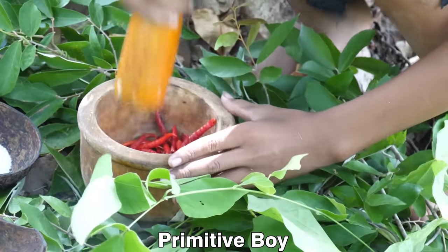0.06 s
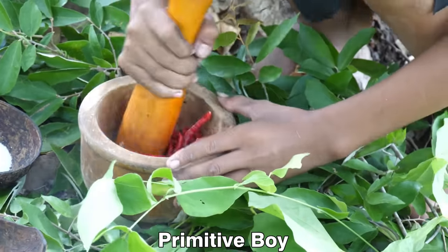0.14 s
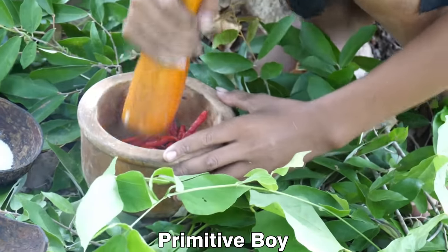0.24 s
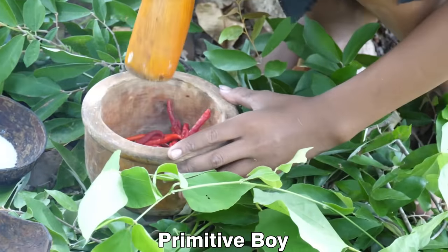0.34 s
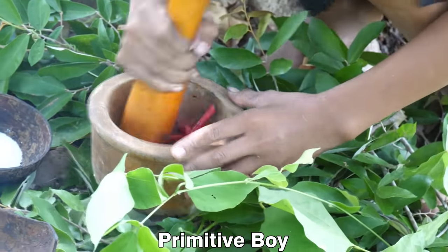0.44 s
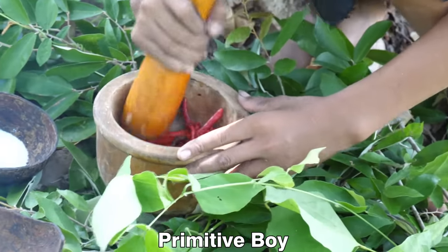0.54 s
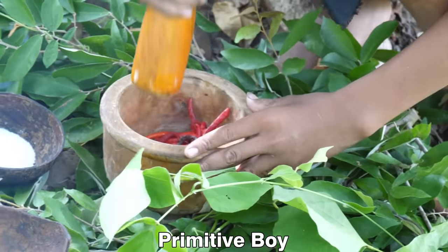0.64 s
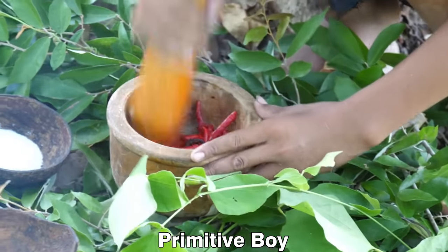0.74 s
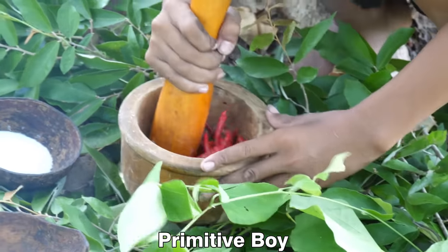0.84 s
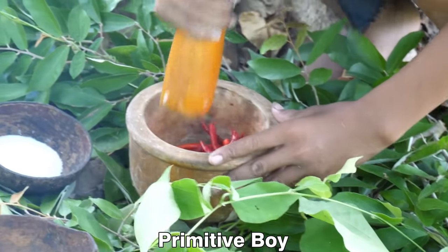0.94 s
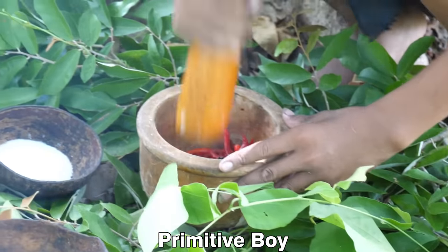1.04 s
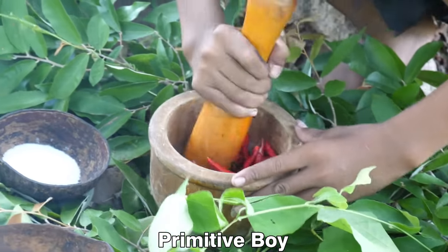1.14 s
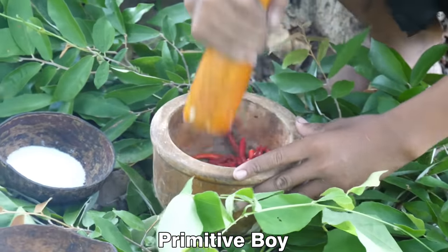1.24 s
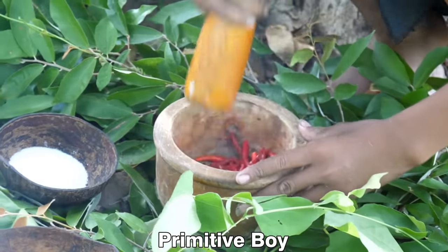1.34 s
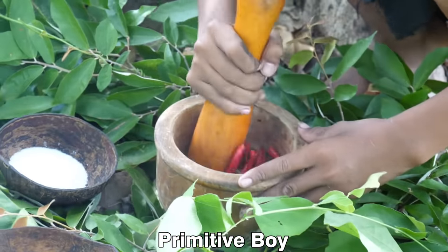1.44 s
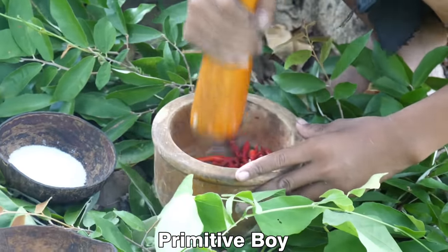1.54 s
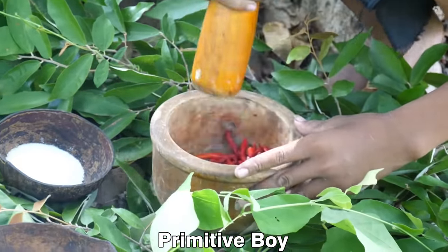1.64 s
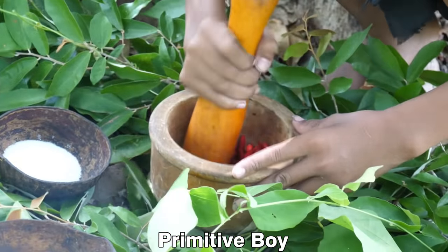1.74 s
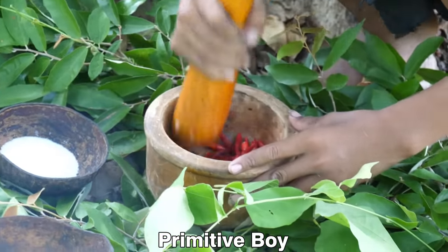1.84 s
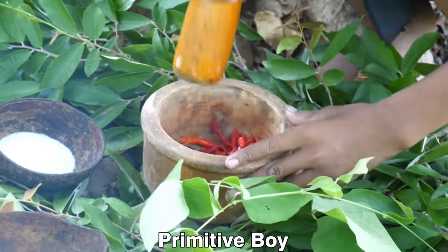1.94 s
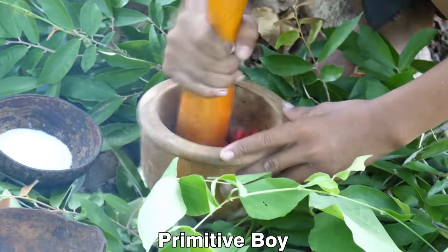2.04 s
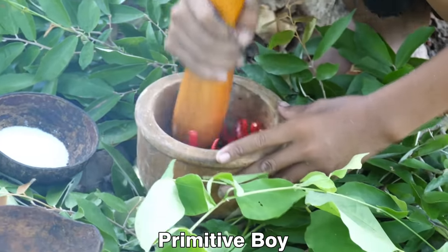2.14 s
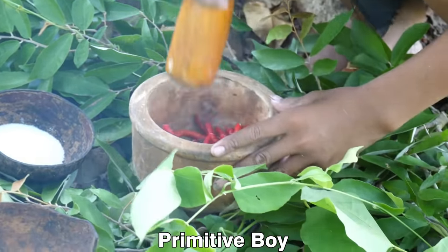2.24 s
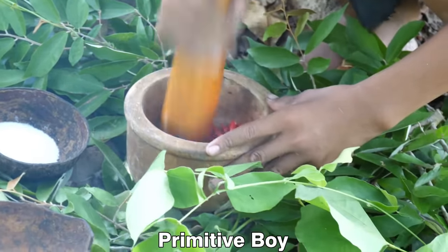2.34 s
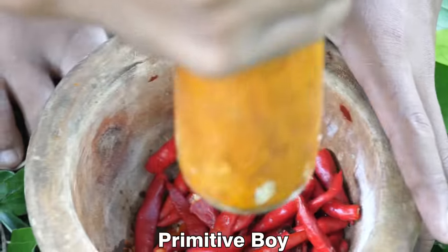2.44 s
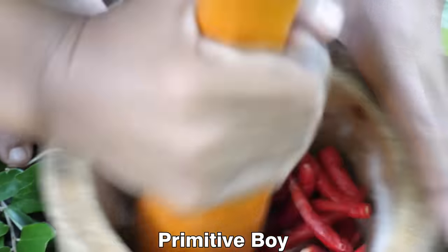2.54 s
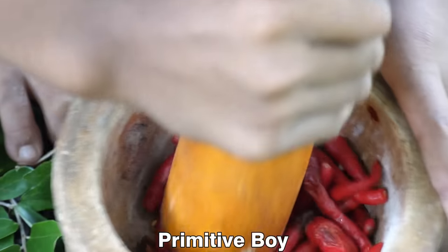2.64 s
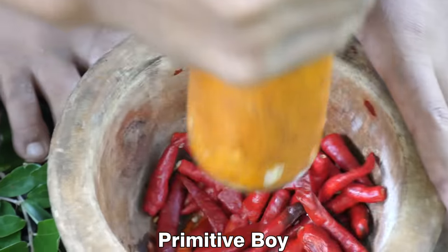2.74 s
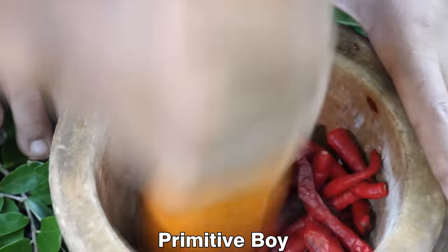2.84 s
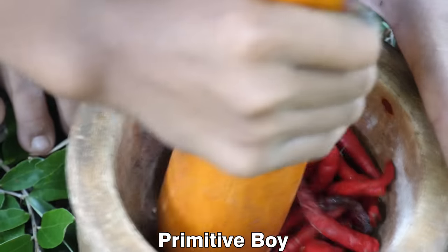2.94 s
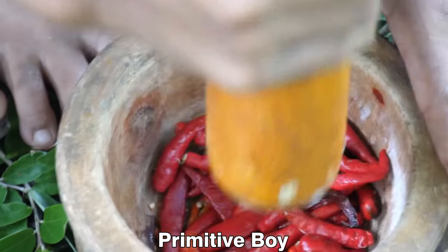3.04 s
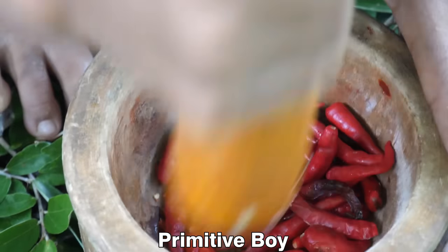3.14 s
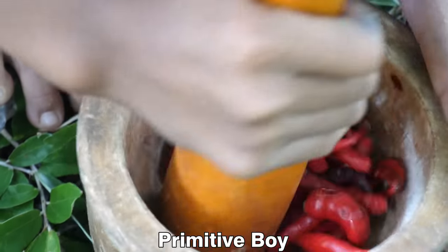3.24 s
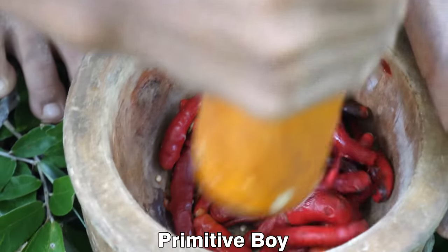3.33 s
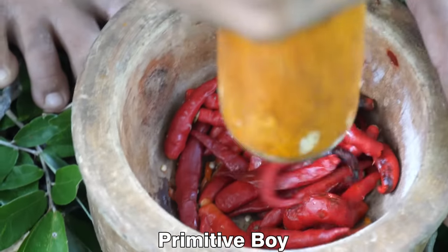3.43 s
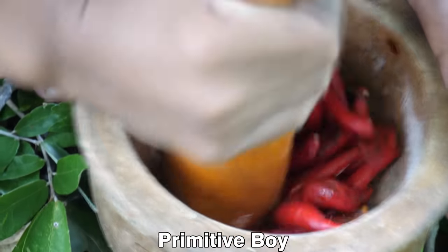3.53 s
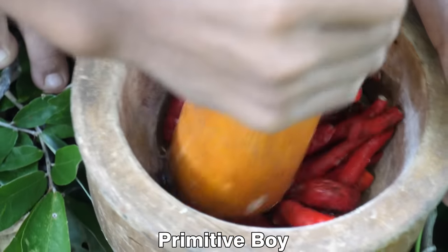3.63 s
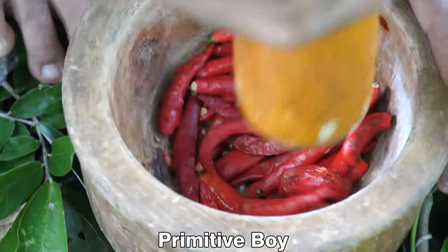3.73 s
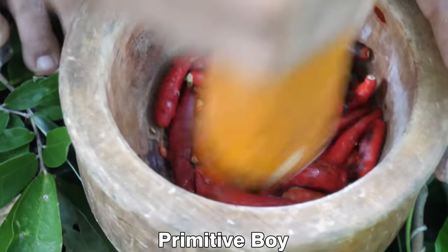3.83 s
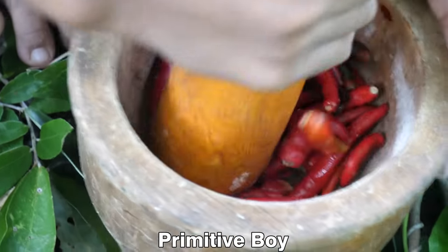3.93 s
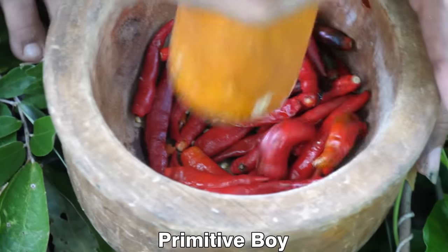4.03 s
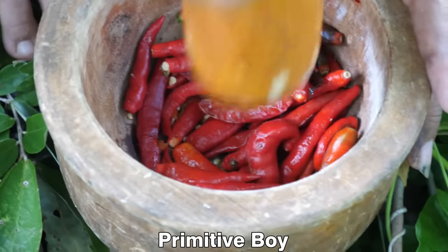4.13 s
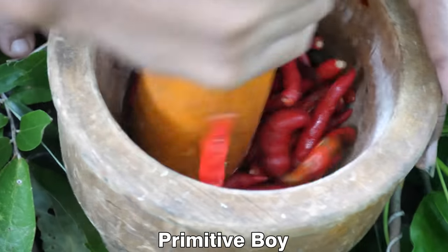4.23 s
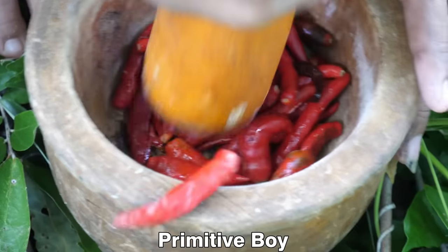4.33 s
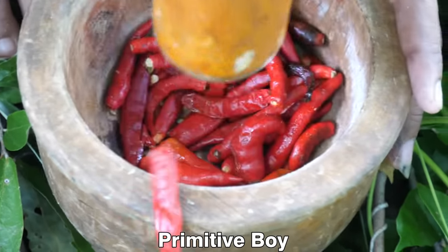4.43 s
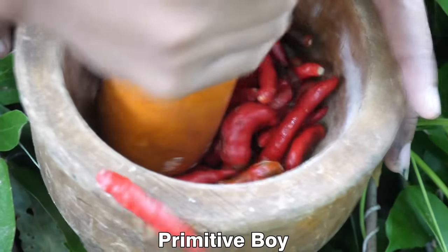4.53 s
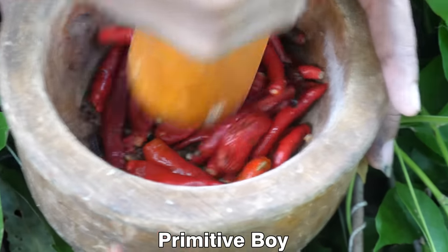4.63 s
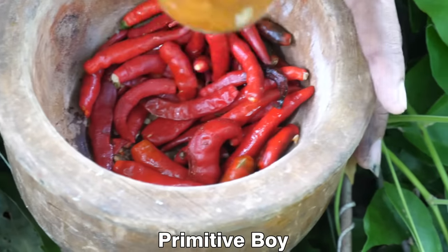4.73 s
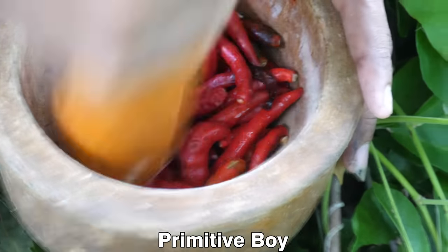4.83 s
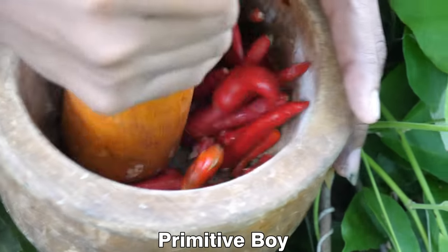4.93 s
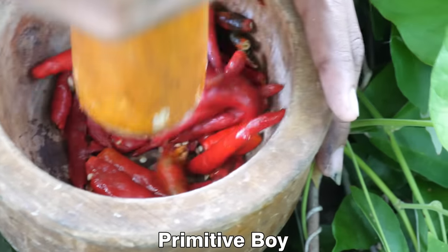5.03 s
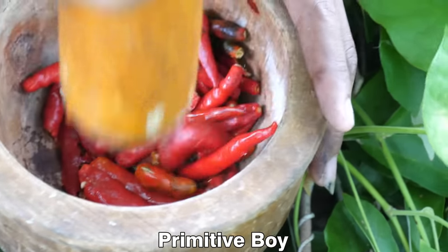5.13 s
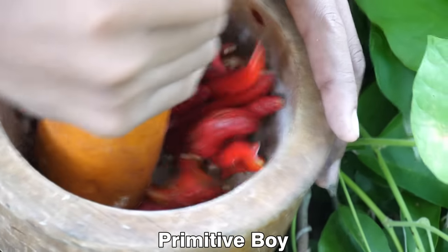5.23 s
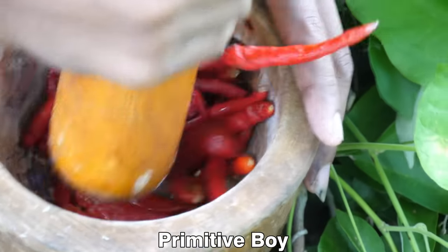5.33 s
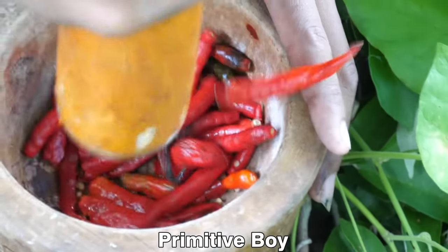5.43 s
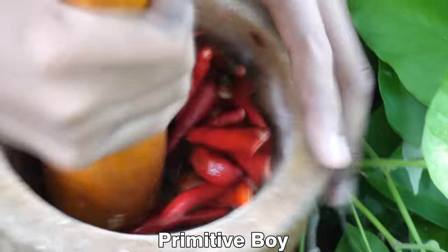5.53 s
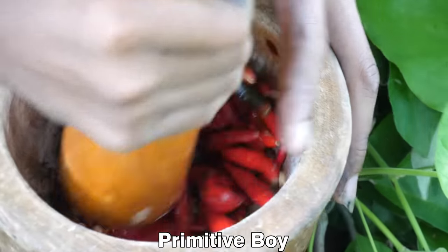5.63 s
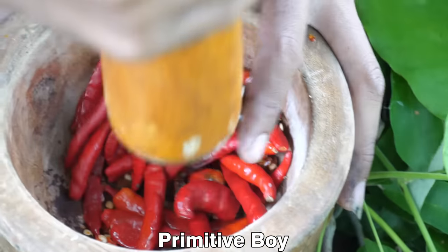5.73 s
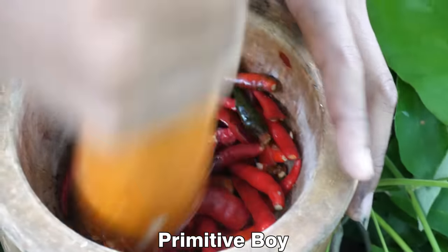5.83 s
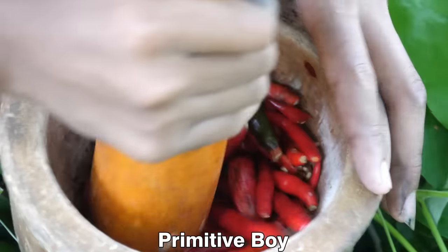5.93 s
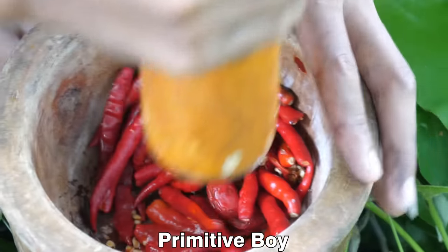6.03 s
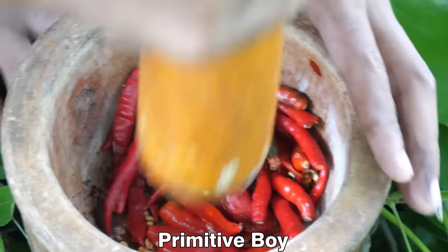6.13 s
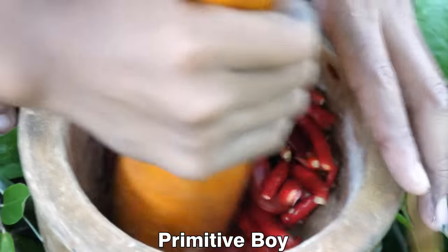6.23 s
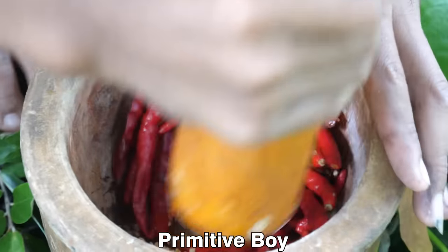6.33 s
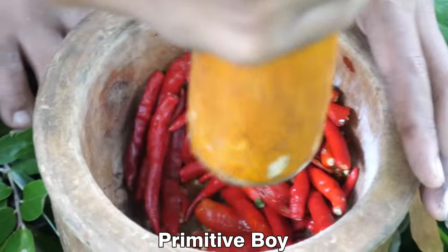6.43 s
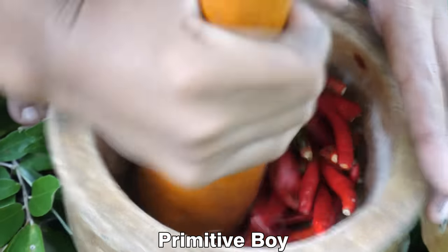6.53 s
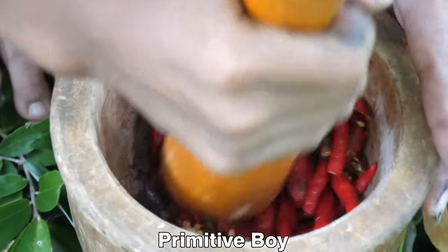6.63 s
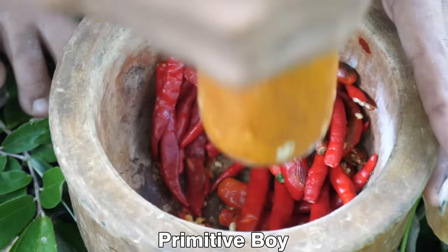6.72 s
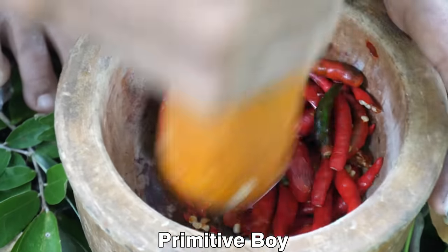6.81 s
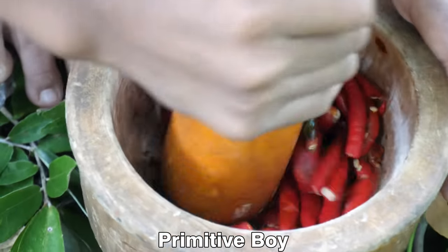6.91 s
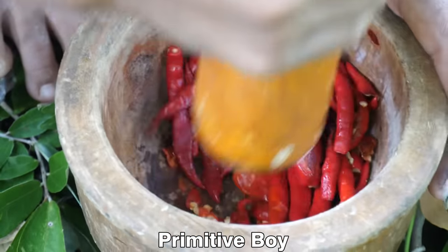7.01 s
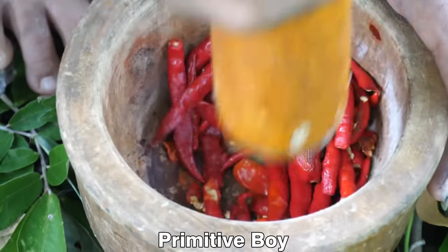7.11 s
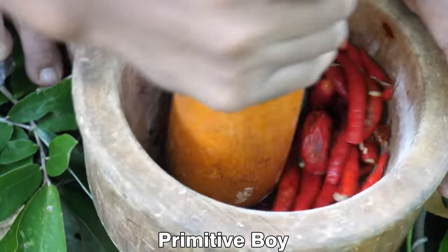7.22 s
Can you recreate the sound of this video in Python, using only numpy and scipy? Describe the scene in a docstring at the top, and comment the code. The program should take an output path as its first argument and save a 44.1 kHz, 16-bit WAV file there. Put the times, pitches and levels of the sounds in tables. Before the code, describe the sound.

A wooden pestle pounds fresh chillies in a wooden mortar with quick, hollow, crunchy knocks over a soft outdoor hiss.

```python
"""A bright outdoor hiss, and at once a wooden pestle pounding fresh chillies, about three blows a second.
Each blow crunches through the pods, lands with a hollow knock and rings the thick wooden mortar, which
thumps on the forest ground. Some blows glance off the wall first; pods rub, tick and snap in between.
The close microphone overloads on the hard knocks, and its gain control ducks the hiss, which swells back."""
import sys
import numpy as np
from scipy import signal
from scipy.fft import rfft, irfft
from scipy.io import wavfile

SR = 44100
rng = np.random.default_rng(int(sys.argv[2]) if len(sys.argv) > 2 else 0)


def waveform_to_disk(signal):
    """Save audio, clipped to [-1, 1], as 16-bit WAV at the path in sys.argv[1]."""
    frames = np.transpose(np.atleast_2d(signal))
    scaled = np.clip(frames, -1, 1) * 32767
    samples = np.round(scaled).astype(np.int16)
    wavfile.write(sys.argv[1], SR, samples)


N = 320607
TIME = np.arange(N) / SR
STROKE = np.arange(SR // 3) / SR   # seconds within one blow


def from_db(db):
    """Decibels to gain."""
    return 10 ** (np.asarray(db) / 20)


def rms_one(x):
    """Scale to rms 1."""
    return x / np.sqrt(np.mean(x ** 2) + 1e-20)


def add(out, s, sound):
    """Mix a sound in from second s."""
    i = max(round(s * SR), 0)
    out[i:i + len(sound)] += sound[:len(out) - i]


def band(x, hz, kind, order=2):
    """Butterworth filter."""
    sections = signal.butter(order, np.clip(hz, 10, .45 * SR), kind, fs=SR, output="sos")
    return signal.sosfilt(sections, x + 1e-18)


def ring(x, hz, t60):
    """One mode: a unit click sets a sine of height 1 ringing."""
    r, w = from_db(-60 / (t60 * SR)), 2 * np.pi * hz / SR
    return signal.lfilter([0, np.sin(w)], [1, -2 * r * np.cos(w), r * r], x + 1e-18)


def grains(size, spread_db):
    """Dense tiny clicks, more uneven as the spread grows, rms 1."""
    return rms_one(rng.standard_normal(size) * from_db(spread_db * np.clip(rng.standard_normal(size), -2, 2)))


def noise(hz, kind):
    """Filtered noise as long as the scene, rms 1."""
    return rms_one(band(rng.standard_normal(N), hz, kind))


def coloured(spectrum):
    """Steady noise of a given spectrum, rms 1."""
    hz, db = np.transpose(spectrum)
    gain = from_db(np.interp(np.log(np.fft.rfftfreq(N, 1 / SR) + 1), np.log(hz), db))
    return rms_one(irfft(rfft(noise(33, "high")) * gain, N))


# Fader ride of the rustling hiss. Each row: time in seconds, level in dB.
HISS_RIDE = [(0, -36.5), (.75, -36.5), (1.6, -38), (2.2, -47), (2.55, -39.5), (3.1, -53.5), (4.5, -55),
             (6.3, -54), (7.27, -63)]
# Tone of the hiss. Each row: frequency in Hz, relative spectral level in dB.
HISS_TONE = [(25, -7), (150, 1), (290, -8), (500, -1.5), (800, -4), (1500, -7.5), (3000, -8.5), (4500, -9),
             (7000, -13.5), (11700, -18.5), (15500, -27.5)]
# Tone of the forest air. Each row: frequency in Hz, relative spectral level in dB.
AIR_TONE = [(25, -2.5), (110, -3), (260, -13), (520, -8.5), (800, -13.5), (1150, -13.5), (1700, -16),
            (3000, -18), (4800, -21.5), (8000, -30), (12000, -35.5), (15500, -41)]


def outdoors():
    """The bed: a bright hiss that recedes over dull, slightly restless forest air."""
    air_db = -51 + 1.5 * noise(36, "low")
    hiss_db = np.interp(TIME, *np.transpose(HISS_RIDE))
    return from_db(hiss_db) * coloured(HISS_TONE) + from_db(air_db) * coloured(AIR_TONE)


def friction(size, hz, spread_db, squeak_db):
    """Sticking and slipping: a band of grit with two squeaky resonances, rms 1."""
    slips = grains(size, spread_db)
    grit = rms_one(band(slips, [hz / 0.98, hz * 1.2], "band", order=1))
    squeak = rms_one(ring(slips, hz, t60=.006) - ring(slips, hz * 0.6, t60=.006))
    return rms_one(grit + from_db(squeak_db) * squeak)


# Pestle rubs. Each row: peak time in seconds, level in dB, pitch in Hz, half length in seconds.
PESTLE_RUBS = [(0.158, -33.5, 4600, 0.077), (0.803, -17.5, 3200, .005), (1.138, -29.5, 3600, 0.024),
               (1.383, -22.5, 2670, 0.0043), (1.444, -37, 1711, .022), (1.711, -35, 7500, 0.07),
               (1.762, -35, 3800, 0.097), (2.368, -38.5, 2020, 0.0055), (2.474, -37, 5400, 0.012),
               (2.871, -38.5, 2600, 0.032), (3.814, -44, 3700, 0.013), (6.224, -44.5, 5000, 0.011)]


def rubs():
    """The pestle drags along wall and pods in stuttering swells."""
    out = np.zeros(N)
    for s, db, hz, half_s in PESTLE_RUBS:
        stutter = from_db(3 * noise(120, "low"))
        swell = np.exp(-((TIME - s) / half_s) ** 2)
        out += from_db(db) * friction(N, hz, spread_db=9.5, squeak_db=-0.5) * stutter * swell
    return out


def spatter(level_db, rise_s, die_s):
    """Juice and seeds crackle around a landing, which falls at the middle of this sound."""
    t = STROKE - STROKE.mean()
    shape = np.exp(-np.abs(t) / np.where(t < 0, rise_s, die_s))
    return from_db(level_db) * friction(len(STROKE), 6000, spread_db=9, squeak_db=-1.5) * shape


def crunch(crush_s, bright_hz, knock_hz, die_s):
    """Skins burst ever harder as the pestle sinks, then die away; the bowl's hollow colours them."""
    skins = band(grains(len(STROKE), 0.63), 550, "high")
    edge = rms_one(ring(skins, 0.68 * bright_hz, t60=0.0018))
    bursts = rms_one(band(skins, bright_hz, "low")) + from_db(-6) * edge
    hollow = rms_one(ring(bursts, 1.42 * knock_hz, t60=.007))
    after = np.maximum(STROKE - crush_s, 0)   # seconds since landing
    pressure = np.clip(STROKE / crush_s, 0, 1) ** 0.9
    release = 1.77 * np.exp(-after / 0.00013) + 0.31 * np.exp(-after / die_s)
    flesh_thud = from_db(-8.5) * np.sin(2 * np.pi * 290 * after) * np.exp(-after / 0.0004)
    return rms_one(rms_one(bursts) + from_db(0.5) * hollow) * pressure * release + flesh_thud


def soil_thump(force):
    """The low end: the mortar bounces on the soil and its load shuffles."""
    shuffle = rms_one(band(grains(len(STROKE), 2), [250, 900], "band")) * np.exp(-STROKE / .012)
    bounce = from_db(-22.5) * ring(force, 110, t60=.095) + from_db(-23.5) * ring(force, 460, t60=0.011)
    return bounce + from_db(-24) * shuffle


def wood_crack(force):
    """The hard attack: grit and a clack of damped upper modes, different at every landing spot."""
    upper_hz = np.geomspace(1600, 2450, num=7) * (1 + 0.073 * rng.standard_normal(7))
    clack = sum(ring(force, hz, t60=.016) * (-1) ** k for k, hz in enumerate(upper_hz))
    grit = rms_one(band(grains(len(STROKE), 7.2), [1400, 3200], "band"))
    settle = np.exp(-STROKE / 0.002) + from_db(-28.5) * np.exp(-STROKE / .02)
    return from_db(1.5) * clack + grit * settle


# Modes of the wooden bowl. Each row: frequency in Hz, relative level in dB, seconds to fall 60 dB.
BOWL_MODES = [(730, -20, .018), (1177, -1, 0.063), (1160, -38.5, .2), (1800, -34, 0.17),
              (2270, -19.5, 0.063), (3230, -13.5, .016), (3370, -40.5, .12), (3600, -35.5, 0.15)]


def landing(knock_db, knock_hz, wood_db, thump_db):
    """Wood meets wood: a damped knock pitched by where it lands, the ringing bowl, a thump, a crack."""
    force = band(1. * (STROKE == 0), 4900, "low")
    swell = STROKE / 0.00058   # the knock takes a moment to build
    knock = swell * np.exp(1 - swell) * np.sin(2 * np.pi * knock_hz * STROKE)
    cavity = from_db(-3.5) * ring(force, 930, t60=.016)   # air in the bowl
    thump = from_db(thump_db) * soil_thump(force)
    crack = from_db(-6.5 + 0.64 * wood_db) * wood_crack(force)   # grows with the bare wood met
    bowl = sum(from_db(db + rng.normal(0, 0.23)) * ring(force, hz, t60) for hz, db, t60 in BOWL_MODES)
    body = from_db(knock_db) * band(knock + cavity, 190, "high", order=1)
    ringing = from_db(wood_db) * band(bowl, 130, "high", order=1)
    return body + ringing + thump + crack


# Square hits. Each row: landing time in seconds, knock level in dB, knock pitch in Hz,
# bare wood level in dB, crunch level in dB, crunch brightness in Hz, soil thump level in dB.
SQUARE_HITS = [ (0.1705, -3.5, 285, -24.5, -6, 4800, 8.5), (0.493, 5.5, 1010, 9.5, -16.5, 6130, 6.5),
               (1.138, 3, 675, -11.5, -8.5, 4330, 6.5), (1.4639, 1, 950, 1.5, -16, 5630, 6.5),
               (1.79, 2.5, 648, -5, -8.5, 5900, 8.5), (2.6, 3.5, 740, -19.5, -8.5, 3600, 6.5),
               (2.92, 8, 707, -24, -7.5, 4330, -4.5), (3.24, 1, 760, 1, -5.5, 2430, 7),
               (3.576, 2, 882, 1.5, -8.5, 2940, 2.5), (3.922, 6, 730, -20.5, -10, 5000, 5.5),
               (4.246, 7, 667, -4.5, -10, 3680, 5.5), (4.57, 6, 624, -12, -10.5, 5300, 8),
               (5.915, -0.5, 905, -7, -16, 6000, 5.5), (6.251, 9.5, 893, -1.5, -17.5, 4880, -4),
               (6.577, 8, 760, 4, -12.5, 2367, 8.5), (6.907, 7.5, 854, -3.5, -11.5, 1897, 7.5),
               (7.235, 0.5, 710, -30.5, -24, 8800, -0.5)]


def square_blows():
    """The pestle drives straight through the pods, squeezing out juice, and lands."""
    out = np.zeros(N)
    for s, knock_db, knock_hz, wood_db, crunch_db, bright_hz, thump_db in SQUARE_HITS:
        crush_s = .004 * 2 ** (-wood_db / 34.5)   # more bare wood: a thinner bed of pods, crushed sooner
        add(out, s - crush_s, from_db(crunch_db) * crunch(crush_s, bright_hz, knock_hz, die_s=0.0066))
        add(out, s - STROKE.mean(), spatter(level_db=-33, rise_s=0.0037, die_s=0.0082))
        add(out, s, landing(knock_db, knock_hz, wood_db, thump_db))
    return out


def foliage(x, wet_db, t60):
    """Leaves and trunks scatter back a faint, dull tail."""
    echoes = band(band(rng.standard_normal(len(STROKE)), 1400, "high"), 3900, "low", order=1)
    echoes = echoes * from_db(-60 * STROKE / t60) * (1 - np.exp(-STROKE / 0.004))
    return from_db(wet_db) * signal.fftconvolve(x, echoes / np.linalg.norm(echoes))[:N]


def pod_ticks(per_s, level_db):
    """Bruised pods spring back with faint wet ticks at random moments."""
    ticks = (rng.random(N) < per_s / SR) * from_db(1.5 * np.clip(rng.standard_normal(N), -2, 1.5))
    fade = signal.lfilter([1], [1, -np.exp(-1 / (0.00047 * SR))], ticks + 1e-18)
    return from_db(level_db) * fade * friction(N, 6000, spread_db=5.5, squeak_db=-8.5)


# The loudest skin snaps. Each row: start in seconds, rough peak level in dB, pitch in Hz.
SKIN_SNAPS = [(0.7527, -19, 2630), (0.8, -12.5, 3350), (1.3733, -7.5, 6360), (1.3784, -11, 7800),
              (1.5334, -23.5, 6540), (2.375, -30.5, 4880), (2.7232, -23.5, 4240), (2.7392, -19, 5080),
              (2.801, -24.5, 3130), (2.822, -24.5, 2660), (2.836, -22, 4460), (4.3445, -29.5, 4850),
              (4.4538, -27, 2540), (4.4917, -28, 5060), (4.869, -32.5, 2890), (5.008, -30, 4590),
              (5.195, -34.5, 2940), (5.8421, -29, 4230), (6.1673, -35, 3030)]


def snaps():
    """Chilli skins tear in short, gritty bursts."""
    out = np.zeros(N)
    for s, peak_db, hz in SKIN_SNAPS:
        length_s = 0.011 * 2 ** (peak_db / 24)   # bigger tears last longer
        tear = friction(len(STROKE), hz, spread_db=8, squeak_db=-8) * np.exp(-(STROKE / length_s) ** 2)
        add(out, s, from_db(peak_db - 7.5) * tear)   # the body sits below the peak
    return out


# Glancing hits. Each row: start in seconds, bare wood level at the wall in dB,
# knock level at the bottom in dB, bare wood level at the bottom in dB.
GLANCING_HITS = [(0.8100, -7.5, -30, 3.5), (2.0915, -3, -26, 4), (4.8995, 3, 8, -28),
                 (5.2495, -3.5, 2, -48), (5.569, -6.5, 3.5, -51)]


def glancing_blows(skid_s, thump_db):
    """The pestle clips the wall, scrapes down it and squashes the pods at the bottom."""
    out = np.zeros(N)
    for s, wall_db, knock_db, wood_db in GLANCING_HITS:
        scrape = friction(len(STROKE), 3250, spread_db=4.5, squeak_db=6.5) * np.exp(-STROKE / 0.0092)
        wall = landing(knock_db=-0.5, knock_hz=1220, wood_db=wall_db, thump_db=thump_db)
        add(out, s, wall + from_db(-14) * scrape)
        add(out, s + skid_s - STROKE.mean(), spatter(level_db=-31.5, rise_s=0.0018, die_s=0.014))
        add(out, s + skid_s, landing(knock_db, knock_hz=760, wood_db=wood_db, thump_db=thump_db))
    return out


def scene():
    """A near-centre image: sound reaches one microphone port a fraction of a sample before the other."""
    blows = square_blows() + glancing_blows(skid_s=.00676, thump_db=-2.5)
    mortar = band(blows, 84, "high") + snaps() + rubs() + pod_ticks(per_s=3.8, level_db=-36.5)
    mid = mortar + foliage(mortar, wet_db=-32.5, t60=.3) + outdoors()
    side = from_db(-20) * np.gradient(mid) + from_db(-68) * coloured(AIR_TONE)
    side += from_db(-72) * noise([35, 220], "band")   # faint low rumble that widens the stereo image
    return mid + side * np.array([[1], [-1]])


def gain_control(x, threshold_db, release_db_per_s, attack_s):
    """Peaks over the threshold duck the gain, too late for the first cycles; it climbs back steadily."""
    over_db = np.maximum(20 * np.log10(np.abs(x).max(axis=0) + 1e-9) - threshold_db, 0)
    duck_db = np.maximum.accumulate(over_db + release_db_per_s * TIME) - release_db_per_s * TIME
    lag = np.exp(-1 / (attack_s * SR))
    return x * from_db(-signal.lfilter([1 - lag], [1, -lag], duck_db))


def record(dry):
    """The microphone chain: gain control, soft clipping and a steep high cut."""
    ducked = gain_control(dry, threshold_db=-1.5, release_db_per_s=41.5, attack_s=0.0044)
    clipped = ducked / (1 + ducked ** 6) ** (1 / 6)
    return signal.sosfilt(signal.ellip(10, .1, 80, 15800, fs=SR, output="sos"), clipped)


dry = scene()
out = record(dry)
waveform_to_disk(out)
```